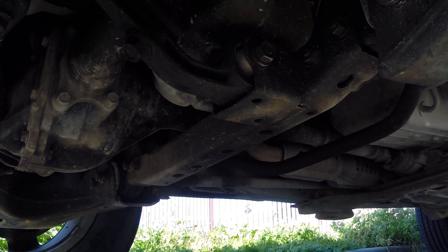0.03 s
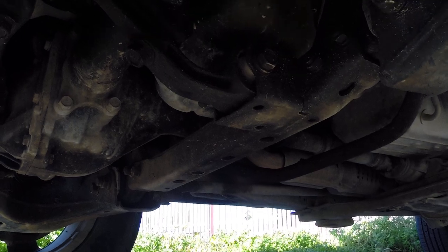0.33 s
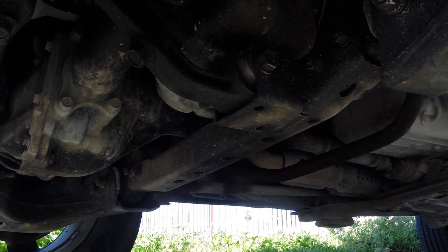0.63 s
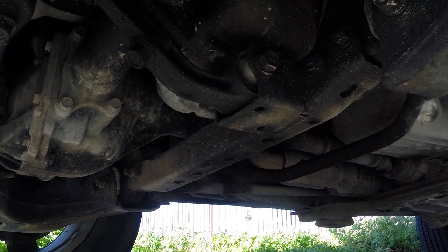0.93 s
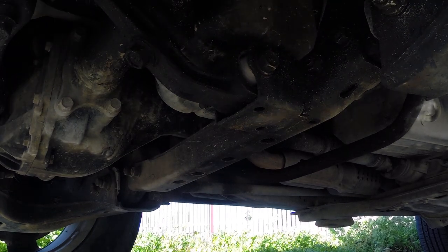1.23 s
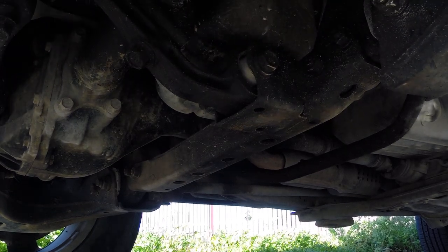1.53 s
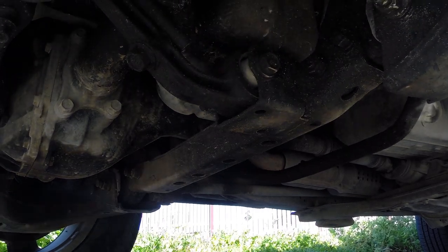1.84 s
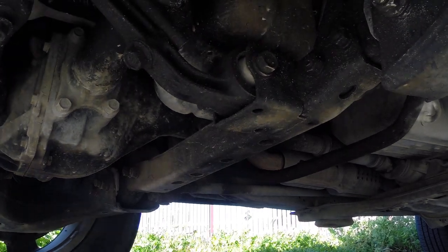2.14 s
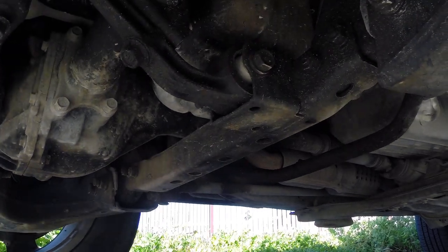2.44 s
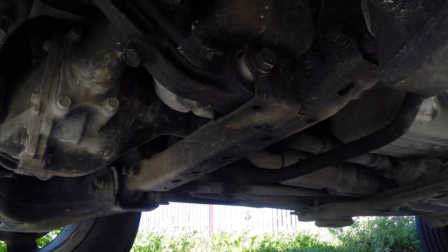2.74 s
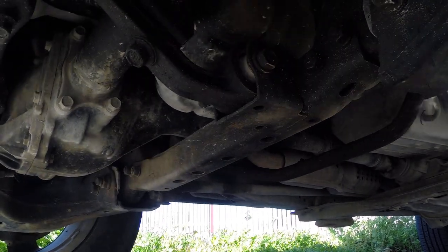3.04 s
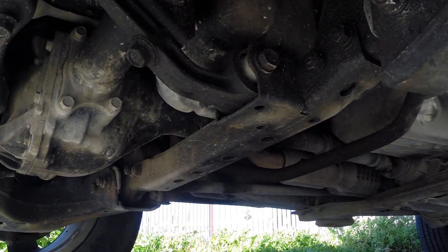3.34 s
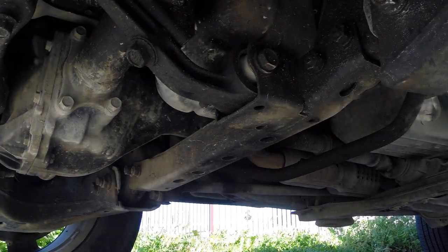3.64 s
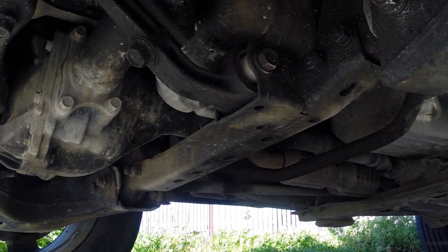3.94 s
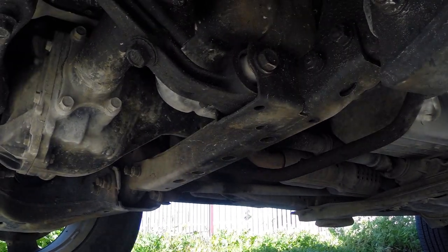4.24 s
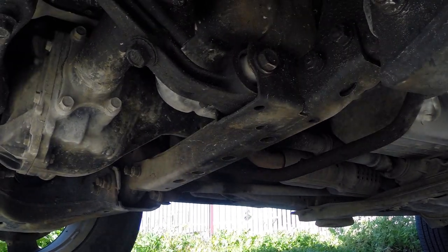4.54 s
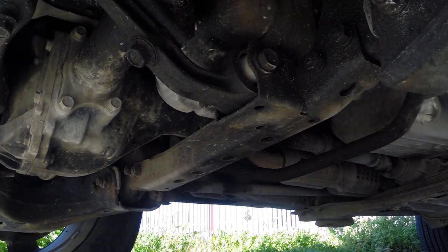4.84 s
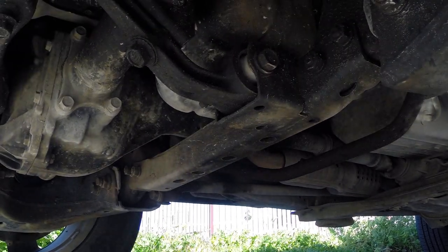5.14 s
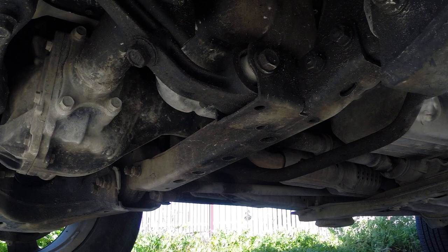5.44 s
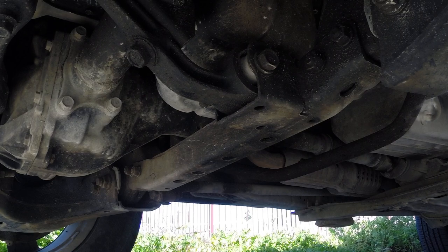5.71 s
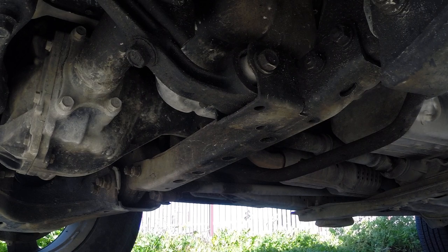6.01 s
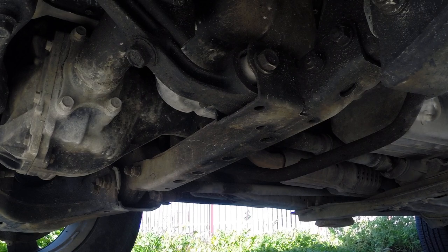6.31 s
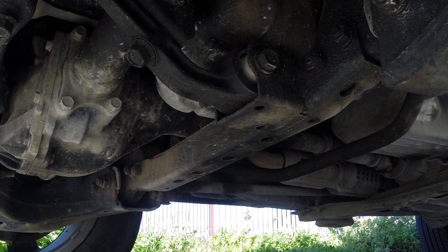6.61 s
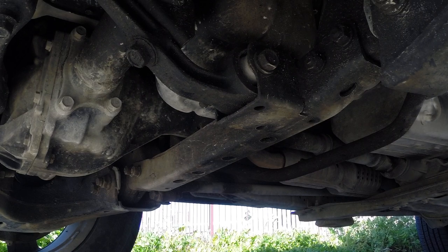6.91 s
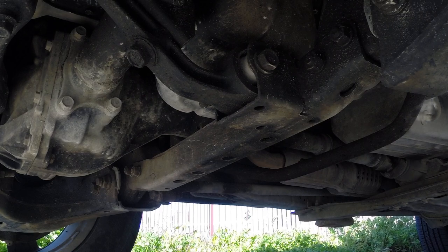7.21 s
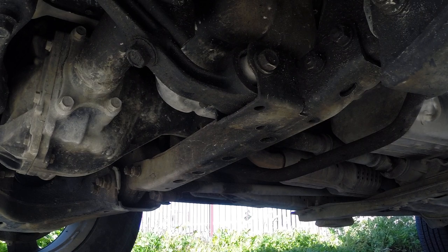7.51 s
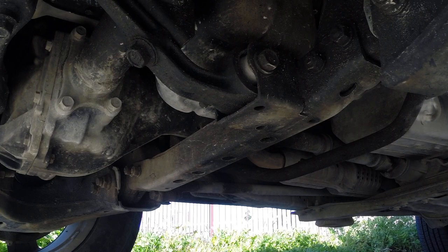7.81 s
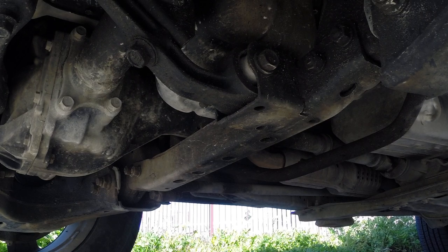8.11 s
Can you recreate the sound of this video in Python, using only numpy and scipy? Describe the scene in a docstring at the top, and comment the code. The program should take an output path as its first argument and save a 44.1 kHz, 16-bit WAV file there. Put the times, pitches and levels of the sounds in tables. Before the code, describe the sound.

Short metallic rattles, clunks and scrapes come from a vehicle's underside as parts are moved, over gusty low wind outdoors.

```python
"""Under a parked vehicle, outdoors. Loose steel clinks, then driveline parts clunk, scrape and ring
as they are moved, with a short echo off the floor pan. Wind buffets the microphone, with one strong
gust; grass and clothing rustle and crackle softly. Towards the end a far engine hums in and one thin
chirp comes from the garden. The camera whines faintly throughout."""
import sys
import numpy as np
from scipy import signal
from scipy.fft import rfft, irfft, next_fast_len
from scipy.io import wavfile
from scipy.ndimage import map_coordinates

SR = 44100
rng = np.random.default_rng(int(sys.argv[2]) if len(sys.argv) > 2 else 0)


def to_wav(sig):
    """Store sig (one row per channel, or 1-D mono) as 16-bit WAV at the path in sys.argv[1].

    Samples outside -1..1 are clipped; the rate is SR.
    """
    pcm = np.clip(np.atleast_2d(sig), -1, 1) * 32767
    pcm = np.round(pcm).astype(np.int16)
    wavfile.write(sys.argv[1], SR, pcm.T)  # frames by channels


N = 364266

# Table levels are relative: each layer adds its own trim.
# the wind's rise and fall: time_s, buffet_db, flow_db
WIND_LEVELS = [(0.09, -17.5, -21), (0.55, -22, -24.5), (0.8, -29, -33.5), (1.8, -34, -39.5),
               (2.3, -31, -36), (2.9, -40, -41.5), (3.02, -25.5, -27.5), (3.21, -28.5, -28),
               (3.36, -17, -15.5), (3.54, -20, -13.5), (3.95, -27.5, -26), (4.4, -29, -27),
               (5.38, -30, -31.5), (5.58, -21.5, -24.5), (5.95, -28.5, -33), (6.4, -37, -42.5),
               (7.6, -41, -41), (8.26, -42.5, -34.5)]
# single eddies thumping the microphone: time_s, boost_db
EDDIES = [(0.44, 4.5), (0.588, 6.5), (0.97, 4.5), (1.642, 4.5), (3.35, 2), (3.47, 1.5), (3.545, 2),
          (3.728, 5), (3.84, 2), (3.936, 6.5), (4.211, 7), (4.488, 8), (4.575, 5.5), (4.72, 7.5),
          (5.04, 5.5), (5.17, 6.5), (5.5, 3.5)]
# grass and clothing stirring: peak_s, level_db, rise_s, fall_s
RUSTLE_SWISHES = [(0.5, -49.5, 0.13, 0.12), (0.97, -53.5, 0.21, 0.25), (1.25, -46.5, 0.041, 0.078),
                  (1.54, -53.5, 0.051, 0.04), (1.67, -44, 0.1, 0.065), (1.9, -40.5, 0.074, 0.078),
                  (2.27, -54, 0.028, 0.14), (2.57, -55, 0.16, 0.27), (3.02, -49.5, 0.06, 0.089),
                  (3.651, -54, 0.4, 0.3), (4.14, -59, 0.045, 0.43), (5.21, -53, 0.091, 0.11),
                  (7.24, -61, 0.15, 0.19)]
# loose steel hits: start_s, level_db, edge_re_hit_db, pitch_hz, crack_t60_s
CLINK_HITS = [(0.084, -22, -5, 1280, 0.031), (0.097, -14, -17, 1250, 0.035),
              (0.129, -17.5, -28, 1870, .028), (0.138, -18.5, -17, 2930, 0.02),
              (0.18, -14, -16, 2960, 0.016), (0.2268, -10.5, -15, 1170, .018),
              (0.2377, -3, -29, 2100, .015), (0.2577, -17, -32, 3480, 0.026),
              (0.2776, -13, -27, 1230, .035), (0.2858, -14.5, -33, 1290, 0.023),
              (0.318, -20.5, -25, 1340, .035), (0.3258, -8.5, -21, 3526, 0.023),
              (0.375, -13, -33, 1240, 0.03), (0.427, -15.5, -45, 1310, 0.023),
              (0.459, -24, -45, 1270, 0.02)]
# modes of the struck steel and the driveline housing: pitch_hz, level_db, t60_s
STEEL_MODES = [(1250, 13, 0.03), (1330, 15, 0.028), (1818, -3.5, 0.36), (1980, 12.5, 0.033),
               (2580, 7.5, 0.045), (2500, 8, 0.04), (3020, 13.5, 0.027), (3250, -21, 0.094),
               (3430, -6, 0.062), (4400, -20, 0.039), (4800, -24, 0.054), (5370, -23, 0.078),
               (6240, -19, 0.05)]
HOUSING_MODES = [(293, -5, 0.088), (391, -0.5, 0.16), (503, -5, 0.051), (606, -27, 0.024), (839, -2, 0.2),
                 (910, -10.5, 0.14), (994, -3.5, 0.067), (1075, 5, 0.063), (1190, -16, 0.12),
                 (1730, -29, 0.013), (1984, -42, 0.07)]
# echo decay under the floor pan: frequency_hz, t60_s
ECHO_DECAY = [(200, 0.12), (2000, 0.22), (10000, 0.032)]
# driveline hits: start_s, click_db, housing_db, edge_re_click_db, pitch_hz, t60_s
CLUNK_HITS = [(1.453, -22, -29.5, -14.5, 3280, 0.053), (1.625, -26.5, -25.5, -25, 3470, 0.18),
              (1.6713, -37, -29.5, -23, 3380, 0.12), (1.686, -29, -30, -15, 3400, .05),
              (1.9077, -16.5, -9.5, -17.5, 1250, 0.043), (1.9526, -23, -18, -17, 2440, 0.055),
              (2.0162, -30, -31, -14, 5170, 0.07), (2.331, -24.5, -31.5, -20, 1990, .045),
              (2.5462, -38.5, -28, -12, 4220, .06), (3.104, -31, -28, -15.5, 2220, .06),
              (3.215, -35.5, -36, -15, 3530, 0.13), (3.974, -40, -52, -12, 5400, .04),
              (4.1504, -35, -52, -27, 3630, .05), (4.202, -26.5, -47, -25, 3900, .07),
              (4.234, -40, -50, -11, 7000, .05), (4.626, -36, -41, -15, 2200, .07),
              (4.667, -35, -51, -28, 2900, 0.088), (5.0246, -31, -32, -21.5, 2700, 0.088),
              (5.1543, -41, -27.5, -26, 2270, 0.1), (5.6462, -26, -24, -23, 3020, 0.081),
              (5.7552, -36, -37, -10, 7150, 0.037), (6.8105, -36, -50, -32, 2920, .06),
              (6.8747, -41, -54, -28, 3100, 0.054), (7.2566, -39.5, -54, -20, 3900, 0.037),
              (7.538, -37, -49, -28, 2930, .055), (7.864, -38, -44, -29, 2160, 0.068)]
# parts sliding: start_s, length_s, grit_db, housing_db, edge_db, pitch_hz, resonance_db, release_t60_s
SCRAPE_STROKES = [(1.455, 0.003, -54, -27, -47, 1100, 19, 0.074),
                  (1.6083, 0.015, -31.5, -36, -29, 3480, -1, .065),
                  (1.811, 0.11, -56, -39, -70, 1100, 5, .078),
                  (1.913, 0.009, -34, -31, -44, 4900, 10, 0.058),
                  (2.089, 0.039, -72, -35.5, -70, 595, 6, 0.096),
                  (2.4414, 0.014, -24.5, -26, -34.5, 1740, 12.5, 0.055),
                  (2.459, 0.015, -28, -27, -32, 1150, 4, 0.062),
                  (4.439, 0.037, -42, -55, -59, 3260, 11, 0.071),
                  (4.535, 0.031, -43, -31, -57, 1510, 8, 0.084),
                  (5.229, 0.0079, -36, -49, -59, 1790, 20, 0.028),
                  (5.242, 0.011, -31.5, -36.5, -53, 2770, 15.5, 0.1),
                  (5.649, 0.02, -46, -29, -68, 890, 8, .08), (5.696, 0.012, -52, -31, -78, 800, 4, .08),
                  (5.782, 0.017, -43, -29, -77, 2040, 17, 0.065),
                  (6.405, 0.029, -45, -46, -61, 2100, 7, 0.085),
                  (7.861, 0.012, -54, -33.5, -78, 614, 12, 0.084)]
# notes left by two hard jerks: start_s, pitch_hz, level_db, t60_s
RING_NOTES = [(1.612, 3490, -31, 0.15), (1.615, 807, -28, 0.12), (2.443, 288, -23, 0.24),
              (2.444, 917, -18.5, 0.17), (2.444, 1728, -34, 0.12)]
# dry grass snapping: start_s, level_db
GRASS_SNAPS = [(3.622, -53), (3.707, -48), (3.7398, -47), (3.829, -48), (3.86, -52), (3.912, -52)]
# the far engine drawing near: time_s, level_db
ENGINE_LEVELS = [(6.2, -44), (7.1, -39), (8.26, -32)]

# noise colours: frequency_hz, density_db
BUFFET_EQ = [(10, -11.5), (28, 0), (50, 0.5), (90, -2.5), (140, -9.5), (300, -35), (800, -75), (3000, -120)]  # deep wind rumble
ROAR_EQ = [(50, -25.5), (120, 3.5), (200, 2), (320, -5), (500, -19.5), (900, -21.5), (2000, -77),
           (6000, -75.5), (15000, -94)]  # low turbulence
GUST_EQ = [(150, -9.5), (350, 10.5), (600, 2.5), (1000, -6.5), (1500, -19), (2100, -23.5), (3000, -35.5),
           (4000, -43.5), (6000, -66.5), (15000, -74)]  # torn midrange
AIR_EQ = [(100, -14.5), (400, 2), (650, -2), (1000, 3), (1300, -6.5), (1700, -13), (2500, -21), (5000, -52),
          (15000, -55)]  # dull outdoor bed
HISS_EQ = [(1500, -14), (2500, -27), (3200, 11.5), (4000, 4), (5500, 2), (8000, -4.5), (11000, -8.5),
           (14000, -9.5), (15500, -31)]  # thin top
RUSTLE_EQ = [(800, 3), (2000, 4), (3300, 1), (5500, 0), (8000, -10), (11000, -17), (14000, -27),
             (15500, -34)]  # grass and cloth
CRACK_EQ = [(600, 7), (1200, 7.5), (3300, 1.5), (5500, -1), (7000, -17), (15000, -51)]  # steel on steel
EDGE_EQ = [(3000, -12), (6000, 1.5), (8500, -3.5), (11000, -12.5), (14000, -23), (15500, -35.5)]  # sharp edge of a hit
SKID_EQ = [(900, 0), (1500, 6), (3300, 1.5), (5500, 3), (7500, -17), (10000, -11), (14000, -22),
           (15500, -23)]  # skidding steel
CLICK_EQ = [(400, 5), (1500, 3), (2600, 0), (4800, -3.5), (6500, -15), (9000, -32.5), (15000, -52)]  # a driveline contact
THUD_EQ = [(80, -4.5), (250, 7), (450, 7.5), (700, 2.5), (1200, 0.5), (1900, -24), (4000, -42.5),
           (10000, -67.5)]  # the heavy housing

CONTACT_RISE_S = 0.0003
NOW = np.arange(N) / SR


def amp(db):
    """Decibels to gain."""
    return 10 ** (np.asarray(db) / 20)


def unit(x):
    """Scale to rms 1."""
    return x / np.sqrt(np.mean(x ** 2) + 1e-20)


def along(points, hz):
    """Read a curve at hz, on a log frequency axis."""
    f, v = np.transpose(points)
    return np.interp(np.log(hz + 1), np.log(f + 1), v)


def curves(rows):
    """One automation curve for each column after the time."""
    s, *cols = np.transpose(rows)
    return [np.interp(NOW, s, c) for c in cols]


def wobble(rate):
    """A smooth random curve, rate knots a second."""
    return map_coordinates(rng.standard_normal(int(N * rate / SR) + 4), [np.arange(N) * rate / SR])


def noise(eq):
    """Noise of rms 1 with the given colour."""
    m = next_fast_len(N + 8192)
    gain = amp(along(eq, np.fft.rfftfreq(m, 1 / SR)))
    return unit(irfft(rfft(rng.standard_normal(m)) * gain, m)[:N])


def onset(t, rise):
    """A smooth attack of about rise seconds."""
    return 1 - np.exp(-(t / rise) ** 2)


def fade(t, t60):
    """A 60 dB decay in t60 seconds."""
    return np.exp(-np.log(1000) * t / np.maximum(t60, 1e-3))


def ring(modes, t, scatter_db):
    """One blow starts all modes together, each at a new strength; peak 1."""
    hz, db, t60 = np.transpose(modes)[:, :, None]
    strength = amp(db + scatter_db * rng.standard_normal(db.shape))
    x = np.sum(strength * np.sin(2 * np.pi * hz * t) * fade(t, t60), axis=0) * onset(t, rise=0.00019)
    return x / np.abs(x).max()


def burst(envelope, eq, hz, peak_db, ragged_db):
    """A noisy push through a resonant body: one broad peak at hz, and small ones new to each hit."""
    n = len(envelope)
    f = np.fft.rfftfreq(n, 1 / SR)
    ragged = map_coordinates(rng.standard_normal(100), [f / 240], mode="nearest")
    resonance_db = peak_db / (1 + (8 * (f / hz - 1)) ** 2)
    gain = unit(amp(along(eq, f) + ragged_db * ragged + resonance_db))
    cepstrum = irfft(np.log(gain + 1e-6), n)[:n // 2]
    cepstrum[1:] *= 2  # the body rings after the push, never before it
    body = np.exp(rfft(cepstrum, n))
    return irfft(rfft(envelope * rng.standard_normal(n)) * body, n)


def add(track, s, x):
    """Mix x into the track at s seconds."""
    room = track[round(s * SR):][:len(x)]
    room += x[:len(room)]


def wind():
    """Eddies push on the microphone; the faster the flow, the higher and more torn the roar."""
    eddy_db = sum(db * np.exp(-((NOW - s) / 0.03) ** 2) for s, db in EDDIES) + wobble(12)
    buffet_db, flow_db = curves(WIND_LEVELS)
    buffet = amp(buffet_db + 0.6 * eddy_db + 0.8 + 1.1 * wobble(25)) * noise(BUFFET_EQ)
    roar = amp(flow_db + eddy_db - 1.08 + 2.04 * wobble(60)) * noise(ROAR_EQ)
    torn = amp(1.59 * flow_db + 0.81 * eddy_db + 4 + 2 * wobble(130)) * noise(GUST_EQ)
    return buffet + roar + torn


def outdoor_air():
    """A steady bed of dull air with a trace of hiss."""
    return amp(-43.5 + 0.58 * wobble(2.78)) * noise(AIR_EQ) + amp(-66) * noise(HISS_EQ)


def rustle(floor_db=-66.5, grain_db=2.2):
    """Grass and clothing brush: a fine grain that swells and dies with each swish."""
    swishes = [amp(db) * np.exp(-np.maximum((s - NOW) / rise, (NOW - s) / fall))
               for s, db, rise, fall in RUSTLE_SWISHES]
    stir = np.sqrt(amp(floor_db) ** 2 + np.sum(np.square(swishes), axis=0))
    grain = amp(grain_db * (wobble(41) + wobble(400)))
    return stir * grain * noise(RUSTLE_EQ)


def camera_whine(pitch_hz=11280, frame_hz=30):
    """A thin electronic whine that pulses once a frame."""
    pulse = (1 + np.sin(2 * np.pi * frame_hz * NOW)) / 2
    whine = np.sin(2 * np.pi * np.cumsum(pitch_hz + 50 * wobble(300)) / SR)
    return amp(-74.5) * pulse * whine


def clinks(skid_s=0.0073):
    """Loose steel chatters: each piece skids, cracks, sounds its note and rings the steel it meets."""
    out, t = np.zeros(N), np.arange(SR // 2) / SR
    for s, db, edge_db, hz, t60 in CLINK_HITS:
        push = onset(t, rise=0.00032) * fade(t, t60)
        crack = amp(-6.5) * burst(push, CRACK_EQ, hz, peak_db=8, ragged_db=0.5)
        edge = amp(edge_db - 2.8) * burst(push * fade(t, 0.04), EDGE_EQ, hz, peak_db=-2, ragged_db=7)
        note = amp(-15) * np.sin(2 * np.pi * hz * t) * fade(t, t60=0.031)
        steel = amp(-8) * ring(STEEL_MODES, t, scatter_db=2)
        add(out, s, amp(db) * (crack + edge + note + steel))
    skids = sum(amp(db) * np.exp(-np.abs(NOW - s) / skid_s) for s, db, *_ in CLINK_HITS)
    return out + skids * amp(-30 + 4.2 * wobble(400)) * noise(SKID_EQ)


def underbody_echo(x, predelay_samples=130):
    """A short, dense echo between floor pan and ground."""
    hz, t, bands = signal.stft(rng.standard_normal(SR // 3), SR, nperseg=256)
    tail = signal.istft(bands * fade(t, along(ECHO_DECAY, hz)[:, None]), SR, nperseg=256)[1]
    return signal.fftconvolve(x, np.pad(tail, (predelay_samples, 0)) / np.linalg.norm(tail))[:N]


def ticks(per_s=2.1, level_db=-52, spread_db=3):
    """The parts settle with faint clicks at random moments."""
    out, t = np.zeros(N), np.arange(SR // 3) / SR
    push = onset(t, CONTACT_RISE_S) * fade(t, t60=0.028)
    for when, strength in rng.random((int(per_s * N / SR), 2)):
        db = level_db + spread_db * (2 * strength - 1)
        add(out, when * N / SR, amp(db) * burst(push, CLICK_EQ, hz=2600, peak_db=6.5, ragged_db=0))
    return out


def clunks():
    """Slack is taken up: the part clicks, and the heavy housing answers with a short ringing thud."""
    out, t = np.zeros(N), np.arange(SR // 3) / SR
    for s, click_db, housing_db, edge_db, hz, t60 in CLUNK_HITS:
        push = onset(t, CONTACT_RISE_S) * fade(t, t60)
        click = burst(push, CLICK_EQ, hz, peak_db=5.5, ragged_db=3)
        edge = amp(edge_db + 4) * burst(push, EDGE_EQ, hz, peak_db=3, ragged_db=3)
        thud = amp(-5) * burst(push, THUD_EQ, hz=1084, peak_db=5, ragged_db=1.5)
        damped_ring = ring(HOUSING_MODES, t, scatter_db=0.5) * fade(t, 4.1 * t60)
        add(out, s, amp(click_db - 7) * (click + edge) + amp(housing_db + 4) * (damped_ring + thud))
    return out


def scrapes(slips_per_s=600, bite_db=1):
    """Rusty faces slide: a run of tiny slips grinds on the part and shakes the housing."""
    out, t = np.zeros(N), np.arange(SR // 3) / SR
    bite = amp(bite_db * fade(t, t60=0.044))  # a slide starts with a harder jerk
    for s, length, grit_db, housing_db, edge_db, hz, peak_db, t60 in SCRAPE_STROKES:
        stroke = onset(t, rise=0.00013) * fade(np.maximum(t - length, 0), t60) * bite
        slips = (rng.random(len(t)) < slips_per_s / SR) * rng.uniform(0.28, 1, len(t))
        push = stroke * unit(0.72 + signal.fftconvolve(slips, fade(t, 0.0038))[:len(t)])
        grit = amp(grit_db) * burst(push, CLICK_EQ, hz, peak_db, ragged_db=3)
        edge = amp(edge_db) * burst(push, EDGE_EQ, hz, peak_db=5, ragged_db=2.5)
        housing = amp(housing_db) * burst(push, THUD_EQ, min(hz, 1080), peak_db=9.5, ragged_db=2)
        add(out, s, grit + edge + housing)
    return out


def ringing():
    """A hard jerk leaves the part ringing at its own, slightly unsteady notes."""
    out, t = np.zeros(N), np.arange(SR // 3) / SR
    for s, hz, db, t60 in RING_NOTES:
        phase = 2 * np.pi * hz * t + 0.33 * wobble(157)[:len(t)]
        add(out, s, amp(db) * onset(t, rise=0.0034) * fade(t, t60) * np.sin(phase))
    return out


def grass_crackles():
    """Dry grass snaps as the gust passes: tiny and bright, with no body."""
    out, t = np.zeros(N), np.arange(SR // 10) / SR
    push = onset(t, CONTACT_RISE_S) * fade(t, t60=0.013)
    for s, db in GRASS_SNAPS:
        add(out, s, amp(db) * burst(push, EDGE_EQ, hz=10500, peak_db=11, ragged_db=3))
    return out


def far_engine(firing_hz=167.8, fade_in_s=0.19):
    """A wavering firing note carries from afar, with two weak overtones and a dull rush."""
    db, = curves(ENGINE_LEVELS)
    fade_in = np.clip((NOW - ENGINE_LEVELS[0][0]) / fade_in_s, 0, 1)
    phase = 2 * np.pi * np.cumsum(firing_hz + 6 * wobble(40)) / SR
    note = np.sin(phase) + amp(-12) * np.sin(2.5 * phase) + amp(-14) * np.sin(3 * phase)
    hum = amp(2.5 * wobble(5.2)) * note
    rush = amp(-17.5) * noise(AIR_EQ)
    return fade_in * amp(db - 1) * (hum + rush)


def chirp(peak_s=7.535, half_length_s=0.025, pitch_hz=8800):
    """One thin, faint, high chirp from the garden."""
    phase = 2 * np.pi * np.cumsum(pitch_hz + 130 * wobble(600)) / SR
    return amp(-61) * np.exp(-((NOW - peak_s) / half_length_s) ** 2) * np.sin(phase)


def scene():
    """The mono mix: metal and its echo up front, over wind and ambience."""
    metal = clinks() + clunks() + scrapes() + ringing() + ticks()
    echo = amp(-15.5) * underbody_echo(metal)
    ambience = wind() + outdoor_air() + rustle() + grass_crackles() + far_engine() + chirp()
    return (metal + echo + ambience + camera_whine())[None]


def record(dry):
    """A moment of silence, a snap fade-in, and a brick-wall cut of the very top."""
    start_s, fade_in_s, top_hz = 0.069, 0.0044, 15500
    fade_in = np.clip((NOW - start_s) / fade_in_s, 0, 1)
    m = next_fast_len(N + 8192)
    passband = np.fft.rfftfreq(m, 1 / SR) < top_hz
    return irfft(rfft(dry * fade_in, m) * passband, m)[..., :N]


dry = scene()
out = record(dry)
to_wav(out)
```